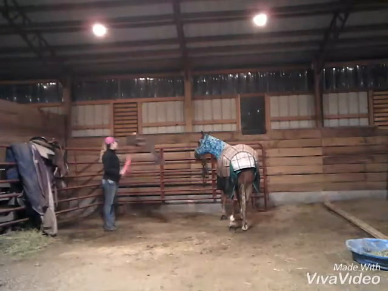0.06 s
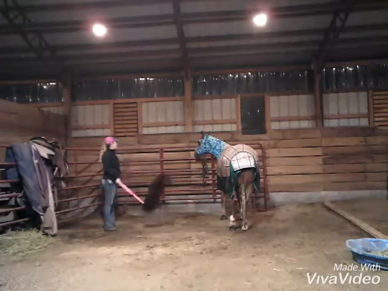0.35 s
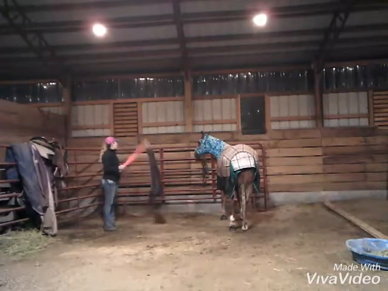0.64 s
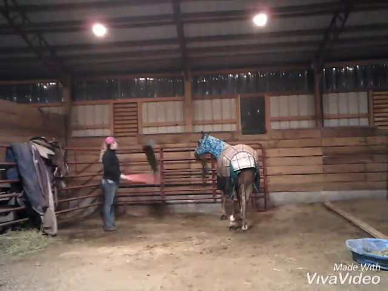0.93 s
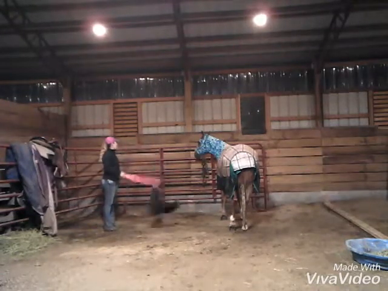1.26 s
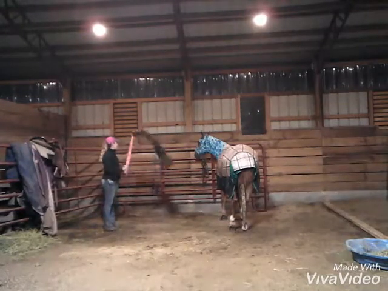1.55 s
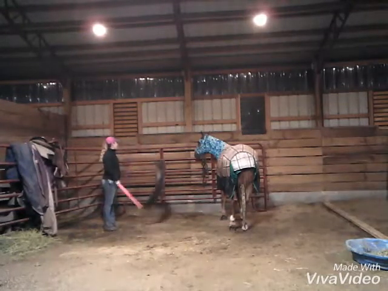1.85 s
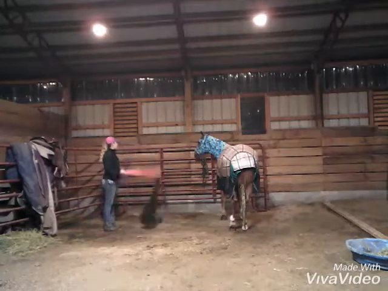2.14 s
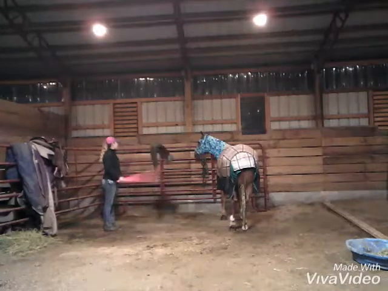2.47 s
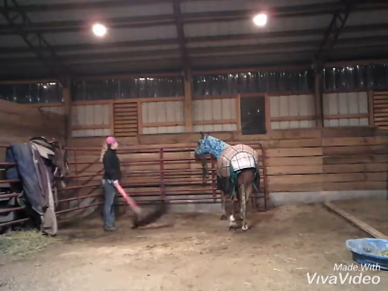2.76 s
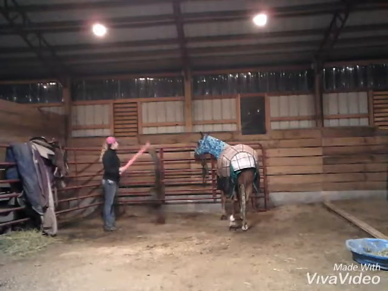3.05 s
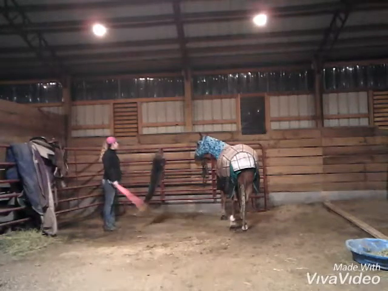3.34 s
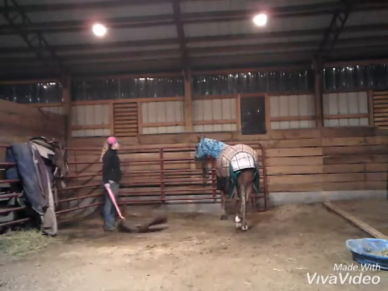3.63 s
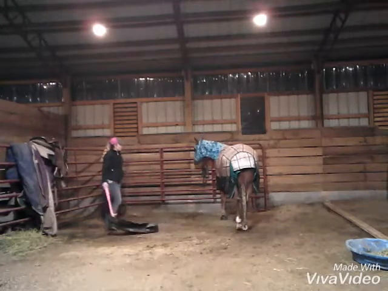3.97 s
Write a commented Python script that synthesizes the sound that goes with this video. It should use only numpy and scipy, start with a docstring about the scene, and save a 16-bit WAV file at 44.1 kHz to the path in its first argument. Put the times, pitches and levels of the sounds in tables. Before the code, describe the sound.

Repeated rustling whooshes and soft cracks of a plastic bag flicked in an echoing barn.

```python
"""A long plastic bag on a stick, flicked up and down nine times, several metres off in a wooden barn.
Each stroke: a swell of crinkling film, a crack as the bag whips round, a hollow flap, a soft air puff.
The bag flutters between strokes and settles on the dirt. The barn rings over quiet, low room noise."""
import sys
import numpy as np
from scipy import signal
from scipy.fft import rfft, irfft
from scipy.io import wavfile
from scipy.ndimage import map_coordinates

SR = 44100
rng = np.random.default_rng(int(sys.argv[2]) if len(sys.argv) > 2 else 0)


def master_out(mix):
    """Clip the mix to full scale and print it as 16-bit PCM to the path in sys.argv[1]."""
    frames = np.transpose(np.atleast_2d(mix))
    ceiling = np.clip(frames, -1, 1)
    pcm = np.round(ceiling * 32767).astype(np.int16)
    wavfile.write(sys.argv[1], SR, pcm)


N = 176400
LEAD_IN_S = 0.5
T = np.arange(-int(LEAD_IN_S * SR), N) / SR

# Strokes: turn t/s, swish level/dB, rise/s, fall/s, whip level/dB, whip half-length/s,
# puff level/dB, hollow flap level/dB, hollow flap f/Hz, narrow hiss level/dB
BAG_STROKES = [ (0.365, -44, 0.067, 0.083, -41.5, 0.013, -47.5, -43.5, 503, -62),
               (0.728, -43, 0.12, 0.06, -35.5, .013, -54, -44.5, 596, -59),
               (1.136, -45, 0.14, 0.082, -36, 0.02, -43.5, -45, 830, -59),
               (1.513, -43.5, 0.21, 0.051, -37.5, 0.014, -50.5, -43.5, 446, -53),
               (1.921, -42, 0.092, 0.058, -36.5, 0.019, -42, -42.5, 810, -55),
               (2.303, -44, 0.11, 0.08, -36, .02, -46.5, -39.5, 680, -60),
               (2.716, -48, 0.14, 0.061, -40, 0.018, -58, -49.5, 336, -57),
               (3.093, -43, 0.1, 0.062, -41, 0.027, -50, -41.5, 380, -57.5),
               (3.528, -46, 0.15, 0.088, -47.5, 0.022, -57, -49, 360, -59)]
# Loose bag fluttering and settling: t/s, level/dB, half-length/s
BAG_FLUTTERS = [(-.02, -48.5, 0.028), (0.274, -50.5, 0.054), (0.456, -48.5, 0.021), (.665, -46, 0.022),
                (0.846, -48, 0.023), (1.058, -47, 0.03), (1.36, -54, 0.054), (2.156, -53.5, 0.093),
                (2.642, -45, 0.039), (2.996, -50.5, 0.053), (3.79, -55, 0.068)]
# Spectra of swish, whip crack, air puff: f/Hz, relative density/dB
SWISH_SPECTRUM = [(40, -30), (100, -17), (300, -2), (650, 0), (1200, -4.5), (2200, -1.5), (2850, -3.5),
                  (3500, -6.5), (4350, -8.5), (5200, -11), (6150, -15), (7000, -15.5), (9000, -16),
                  (12500, -18), (15500, -32.5)]
WHIP_SPECTRUM = [(40, -34), (120, -6.5), (300, 1), (700, 3), (1200, 0), (1550, -3), (2100, 2), (2800, -3.5),
                 (3400, -1), (4500, -9), (6200, -12), (11000, -13.5), (15500, -19.5)]
PUFF_SPECTRUM = [(30, -70), (65, -20.5), (110, -3.5), (170, 3.5), (260, -3.5), (600, 4.5), (2000, -50)]
# Barn reverberation: f/Hz, T60/s, level re direct/dB
BARN_REVERB = [(99, 0.55, -0.5), (405, 0.96, -2.5), (930, 0.73, -0.5), (2900, 0.65, -4.5),
               (6850, 0.59, -5.5), (15100, 0.19, -3.5)]
# Room noise spectrum: f/Hz, relative density/dB
ROOM_SPECTRUM = [(20, -29), (50, -15), (72, -17), (95, 0.5), (130, -1.5), (210, -1.5), (340, -1),
                 (700, -5.5), (1500, -10), (3500, -18.5), (7000, -36.5), (15000, -33)]
# Faint low drones: centre t/s, half-length/s, f/Hz, width/oct, level/dB
ROOM_DRONES = [(2.976, 0.22, 368, 0.059, -54), (3.752, 0.083, 130.6, .05, -55.5),
               (3.76, .15, 353, .08, -56)]


def bag(hollow_lag_s=0.0076, hiss_lead_s=0.078):
    """Swish and narrow air hiss as the film gathers speed; whip crack, hollow flap and puff at the turn."""
    swish_power, whip_env, puff_env, hiss_env, hollow = np.zeros((5, len(T)))
    for (turn_s, swish_db, rise_s, fall_s, whip_db, whip_half_s,
         puff_db, hollow_db, hollow_hz, hiss_db) in BAG_STROKES:
        from_turn = np.where(T < turn_s, (turn_s - T) / rise_s, (T - turn_s) / fall_s)
        swing = np.exp(-from_turn ** 1.33)  # power > 1: rounder top, shorter tails
        swish_power += (undb(swish_db) * swing) ** 2
        hiss_env += undb(hiss_db) * swell(turn_s - hiss_lead_s, half_s=0.036)
        whip_env += undb(whip_db) * swell(turn_s, whip_half_s)
        puff_env += undb(puff_db) * swell(turn_s, half_s=0.029)
        hollow_env = undb(hollow_db) * swell(turn_s + hollow_lag_s, half_s=0.033)
        hollow += hollow_env * noise_band(hollow_hz, width_oct=0.84)
    for at_s, level_db, half_s in BAG_FLUTTERS:
        swish_power += (undb(level_db) * swell(at_s, half_s)) ** 2
    swish = np.sqrt(swish_power) * crinkle(SWISH_SPECTRUM, spread_db=2.5)
    whip = whip_env * crinkle(WHIP_SPECTRUM, spread_db=3.0)
    puff = puff_env * colour(rng.standard_normal(len(T)), PUFF_SPECTRUM)
    hiss = hiss_env * noise_band(centre_hz=3590, width_oct=0.066)
    return swish + whip + hollow + puff + hiss


def crinkle(spectrum, spread_db, clicks_per_s=3500, air_share=0.45, flap_db=0.8):
    """Uneven buckling clicks in air hiss, bunched by the flapping film; unit rms."""
    clicks = (rng.random(len(T)) < clicks_per_s / SR) * rng.choice([-1, 1], len(T))
    size_db = spread_db * np.minimum(rng.exponential(size=len(T)), np.pi)
    clicks = unit(clicks * undb(size_db))
    air = rng.standard_normal(len(T))
    mix = np.sqrt(1 - air_share) * clicks + np.sqrt(air_share) * air
    flapping = undb(flap_db * wander(rate_hz=71.26))
    return colour(mix * flapping, spectrum)


def barn(direct, tail_count=4):
    """Direct sound plus diffuse echoes; several tails randomly crossfaded for a smooth, toneless decay."""
    tail_gains = np.array([wander(rate_hz=44.99) for _ in range(tail_count)])
    tail_gains /= np.linalg.norm(tail_gains, axis=0)
    return direct + sum(echoes(direct * gain) for gain in tail_gains)


def echoes(x, build_s=0.019):
    """Diffuse tail off walls and roof; treble dies first."""
    t = np.arange(SR) / SR
    noise_bins = rfft(rng.standard_normal(SR))  # 1 Hz per bin
    log_f = np.log(np.maximum(np.arange(len(noise_bins)), 1))
    log_centres = np.log([row[0] for row in BARN_REVERB])
    tail = np.zeros(SR)
    for selector, (_, t60_s, level_db) in zip(np.eye(len(BARN_REVERB)), BARN_REVERB):
        band = irfft(noise_bins * np.interp(log_f, log_centres, selector), SR)
        fade = undb(-60 * t / t60_s) * (1 - np.exp(-t / build_s))
        tail += undb(level_db) * fade / np.linalg.norm(fade) * band
    return signal.fftconvolve(x, tail)[:len(x)]


def near_reflection(x, delay_s=0.0005694, gain=0.14):
    """Bounce off a surface beside the listener; ripples the treble when added to x."""
    f = np.fft.rfftfreq(len(x), 1 / SR)
    return gain * irfft(rfft(x) * np.exp(-2j * np.pi * f * delay_s), len(x))


def background(room_db=-52, waver_db=1.2):
    """Low, wavering room noise; faint drones come and go."""
    room_env = undb(room_db + waver_db * wander(rate_hz=1.94))
    room = room_env * colour(rng.standard_normal(len(T)), ROOM_SPECTRUM)
    drones = sum(undb(level_db) * swell(at_s, half_s) * noise_band(centre_hz, width_oct)
                 for at_s, half_s, centre_hz, width_oct, level_db in ROOM_DRONES)
    return room + drones


def undb(db):
    """dB to gain."""
    return 10 ** (np.asarray(db) / 20)


def unit(x):
    """Scale to unit rms."""
    return x / np.sqrt(np.mean(x ** 2))


def colour(x, spectrum):
    """Filter by (f/Hz, level/dB) points; unit rms."""
    hz, db = np.array(spectrum).T
    f = np.maximum(np.fft.rfftfreq(len(x), 1 / SR), 1)
    gain = undb(np.interp(np.log(f), np.log(hz), db))
    return unit(irfft(rfft(x) * gain, len(x)))


def noise_band(centre_hz, width_oct):
    """Noise in one bell-shaped band; unit rms."""
    f = np.maximum(np.fft.rfftfreq(len(T), 1 / SR), 1)
    bins = rng.standard_normal(2 * len(f)).view(complex)
    bell = np.exp(-0.5 * (np.log2(f / centre_hz) / width_oct) ** 2)
    return unit(irfft(bins * bell, len(T)))


def wander(rate_hz):
    """Random points joined by lines; unit rms."""
    points = rng.standard_normal(4096)
    return unit(map_coordinates(points, [(T - T[0]) * rate_hz], order=1, mode="wrap"))


def swell(at_s, half_s):
    """Sech envelope: 1 at at_s, 0.65 at half_s either side."""
    return 1 / np.cosh(np.clip((T - at_s) / half_s, -30, 30))


def scene():
    """Bag in the barn, near reflection, background; mono, lead-in dropped."""
    bag_in_barn = barn(bag())
    mix = bag_in_barn + near_reflection(bag_in_barn) + background()
    return mix[None, -N:]


def record(dry, cutoff_hz=15450):
    """Steep elliptic low-pass."""
    return signal.sosfilt(signal.ellip(12, 0.1, 80, cutoff_hz, fs=SR, output="sos"), dry)


dry = scene()
out = record(dry)
master_out(out)
```